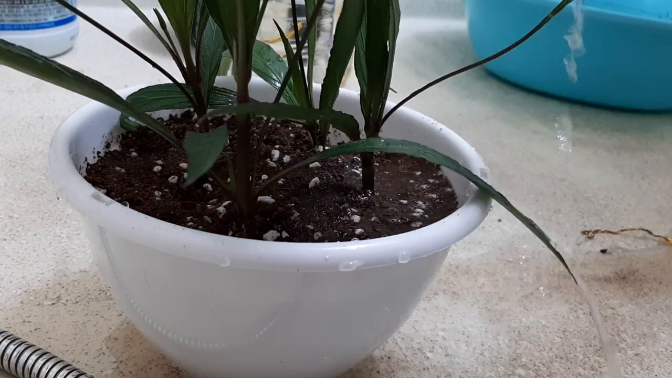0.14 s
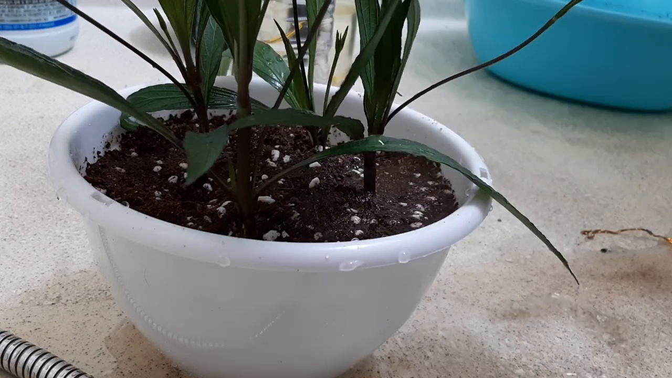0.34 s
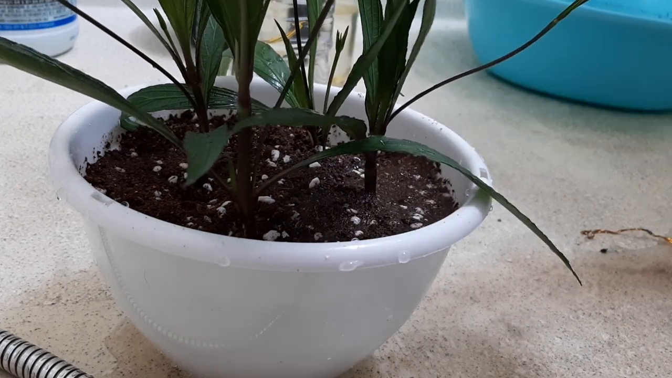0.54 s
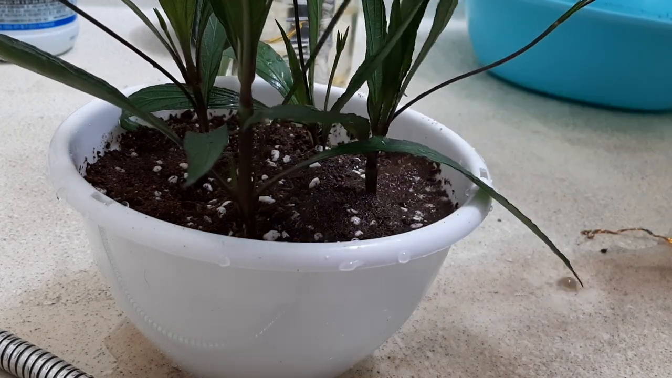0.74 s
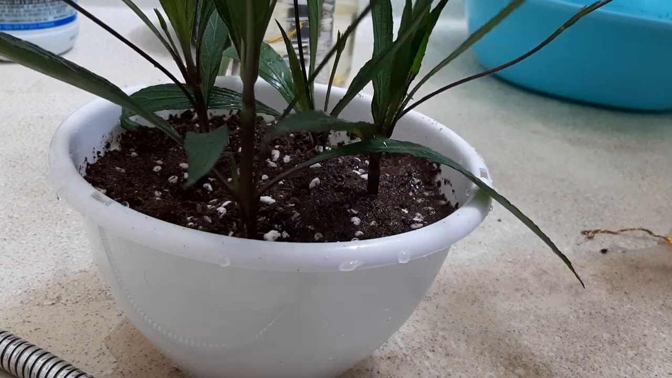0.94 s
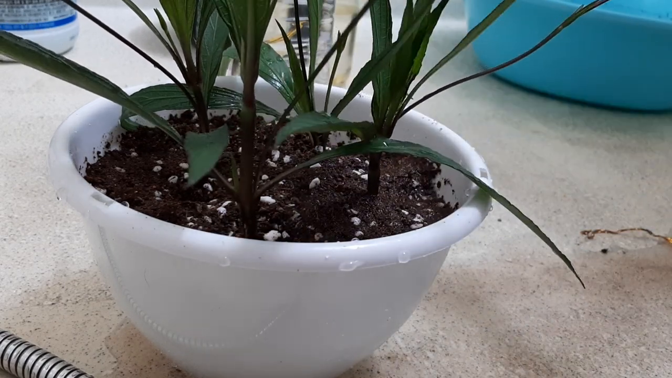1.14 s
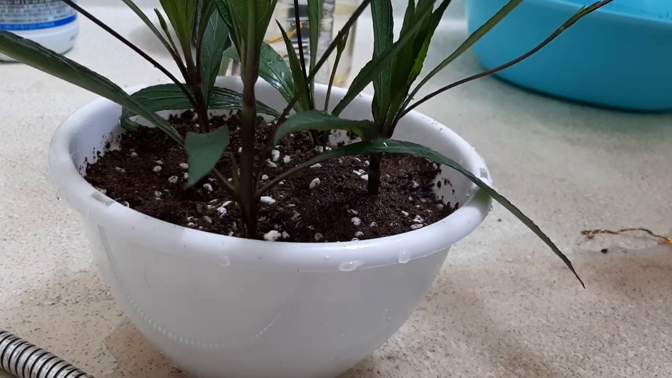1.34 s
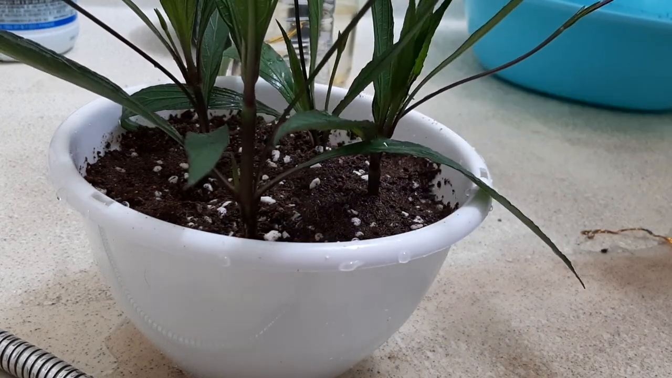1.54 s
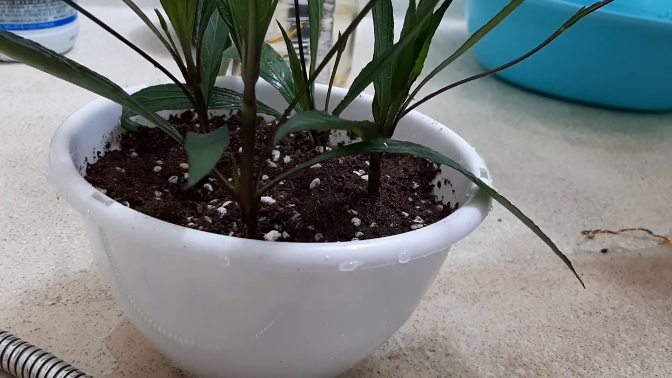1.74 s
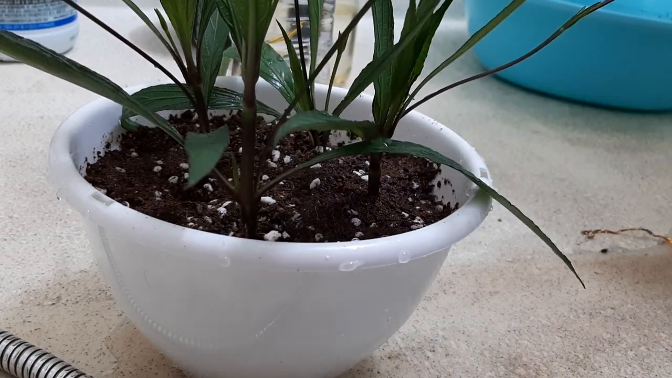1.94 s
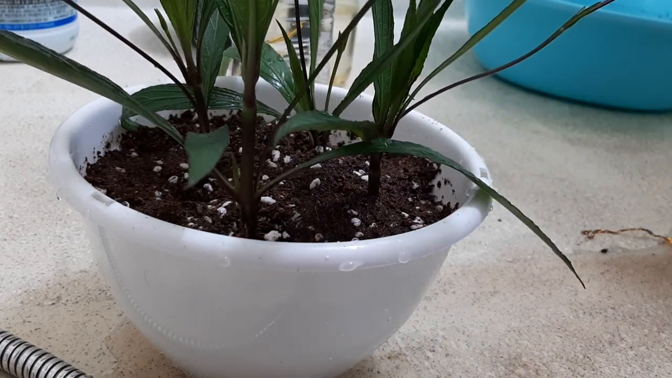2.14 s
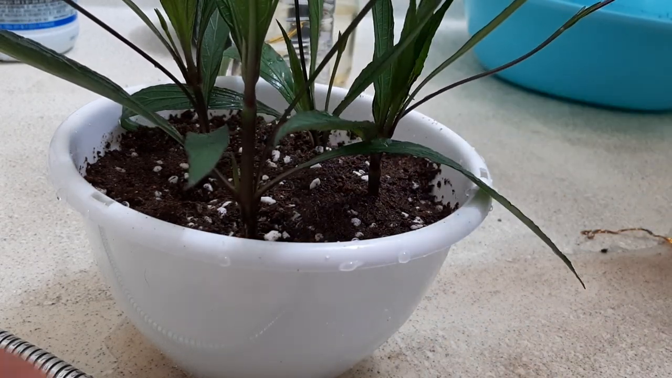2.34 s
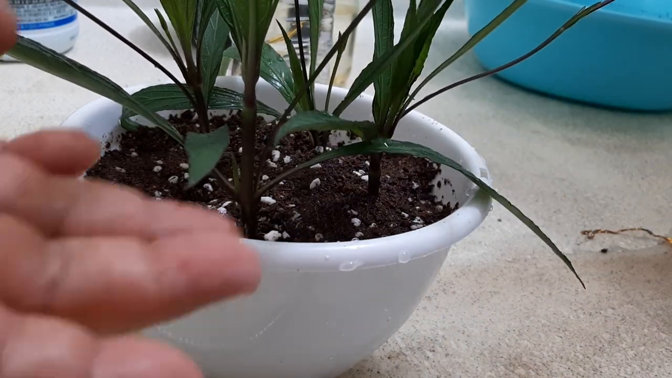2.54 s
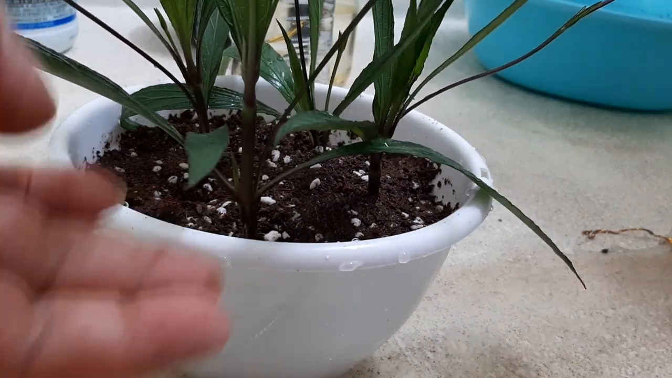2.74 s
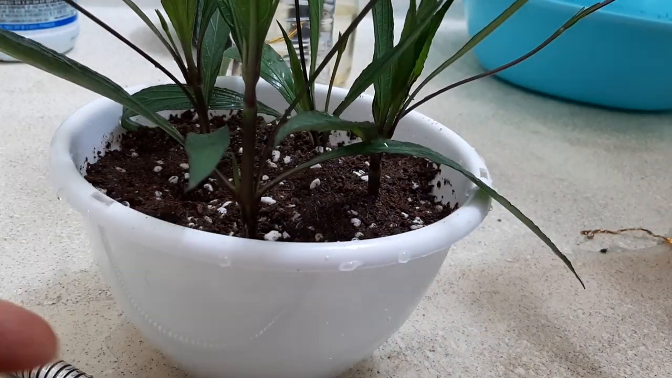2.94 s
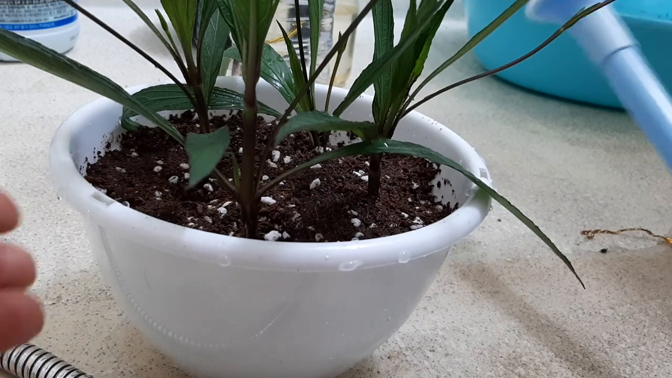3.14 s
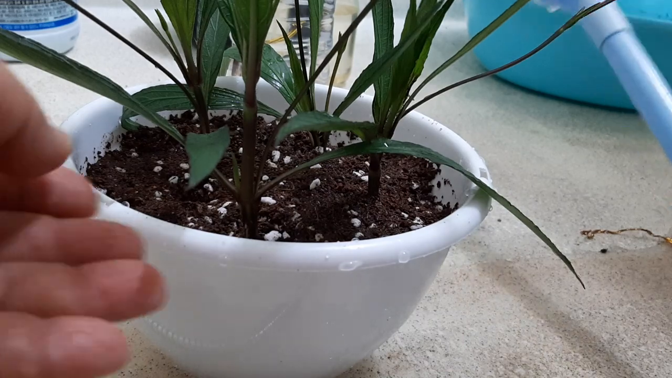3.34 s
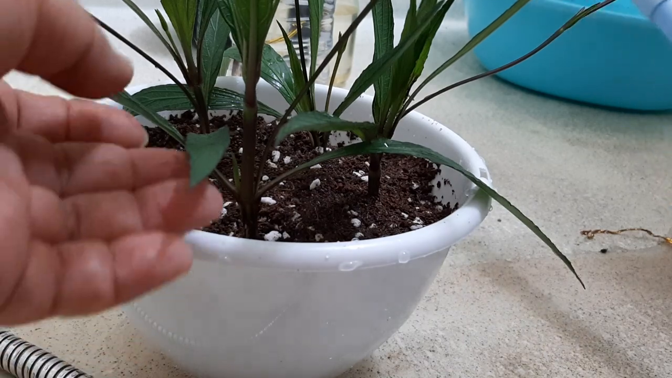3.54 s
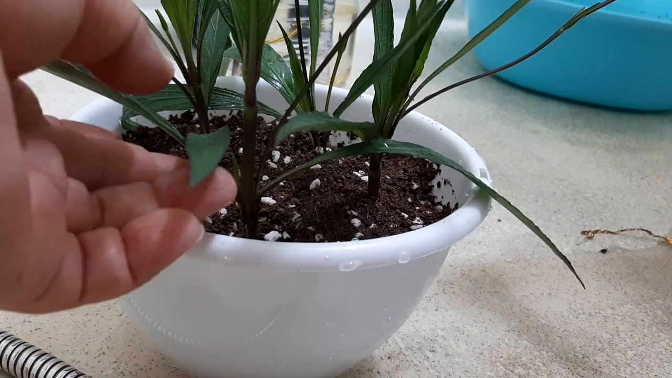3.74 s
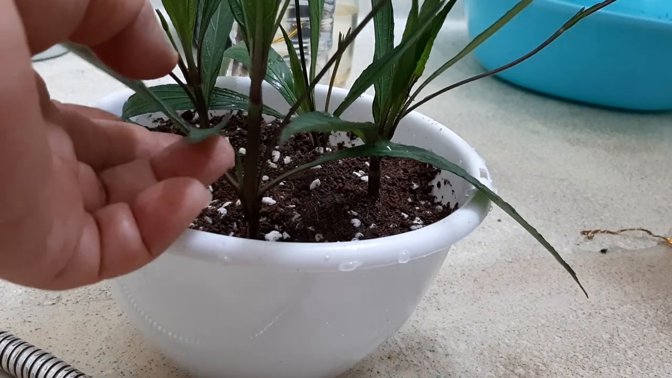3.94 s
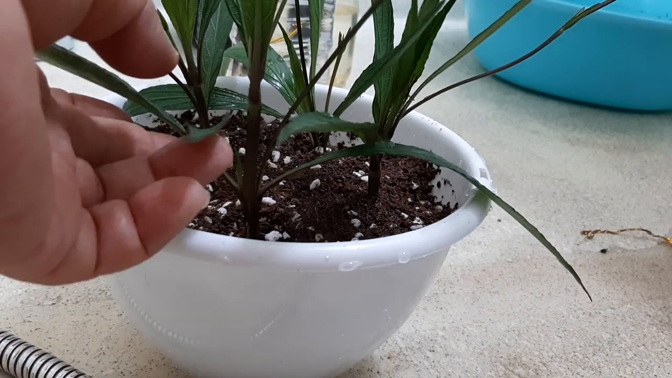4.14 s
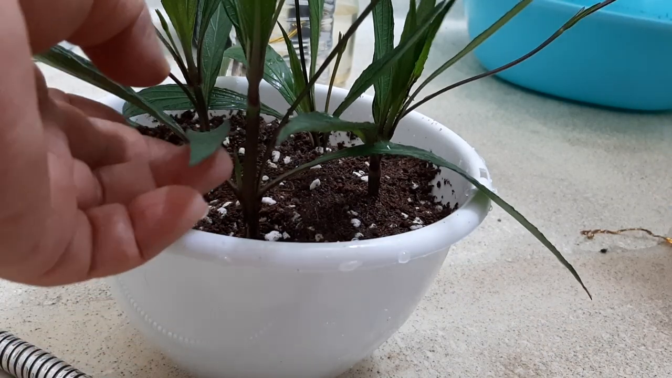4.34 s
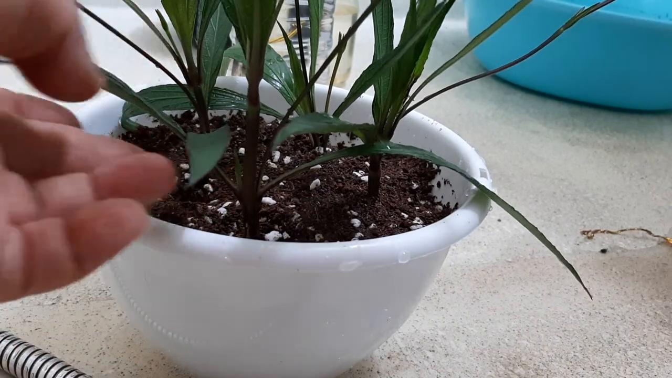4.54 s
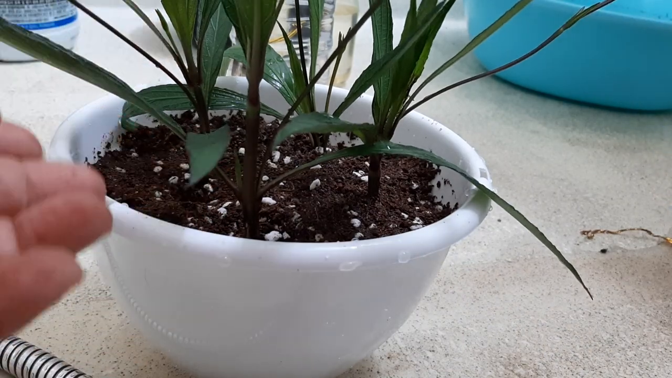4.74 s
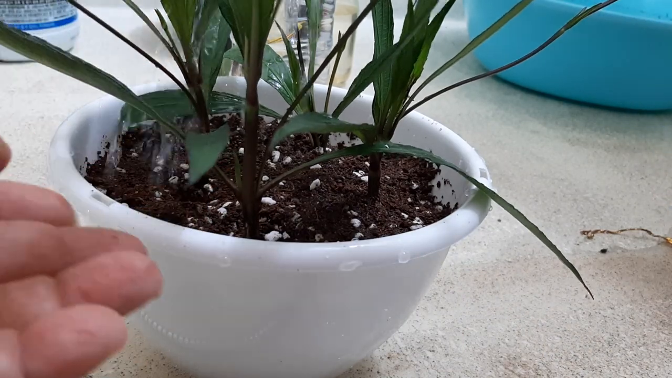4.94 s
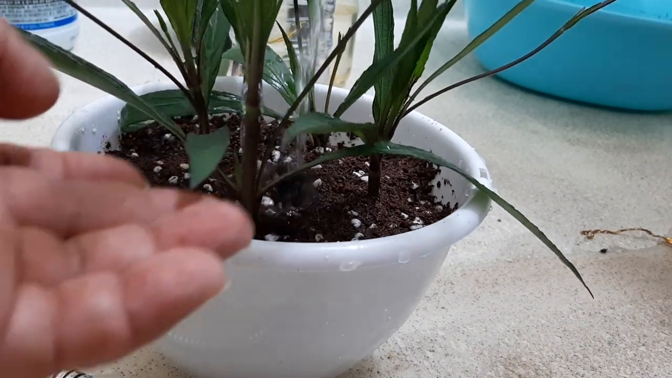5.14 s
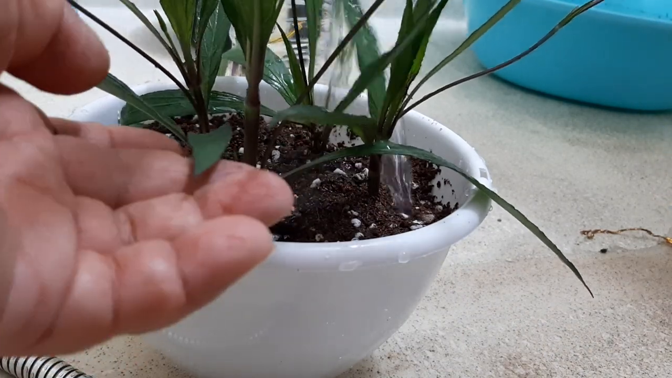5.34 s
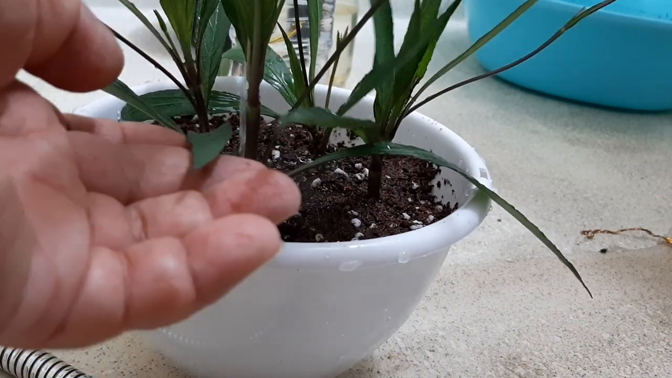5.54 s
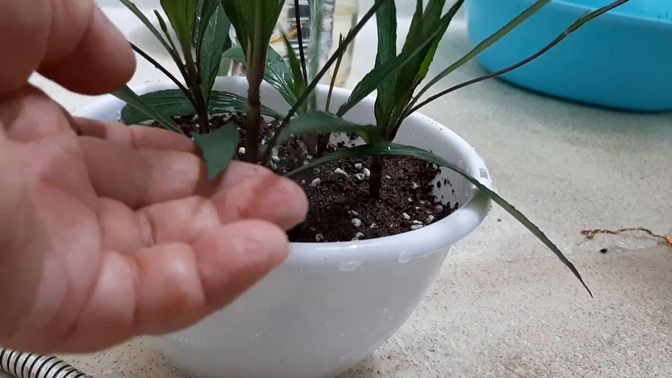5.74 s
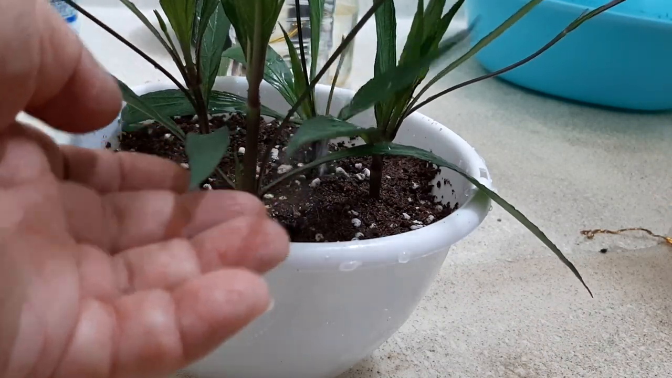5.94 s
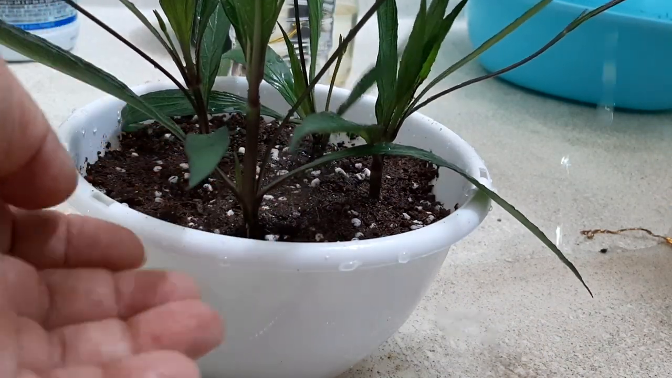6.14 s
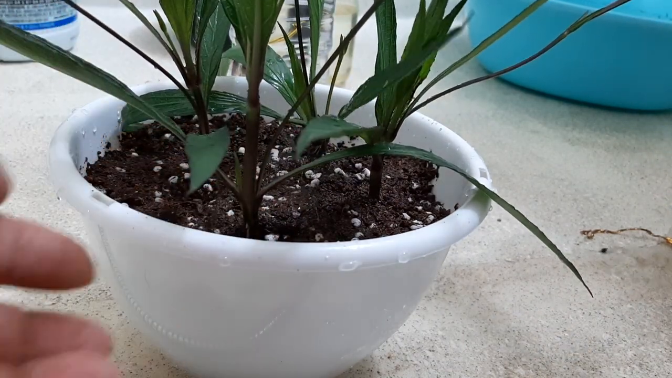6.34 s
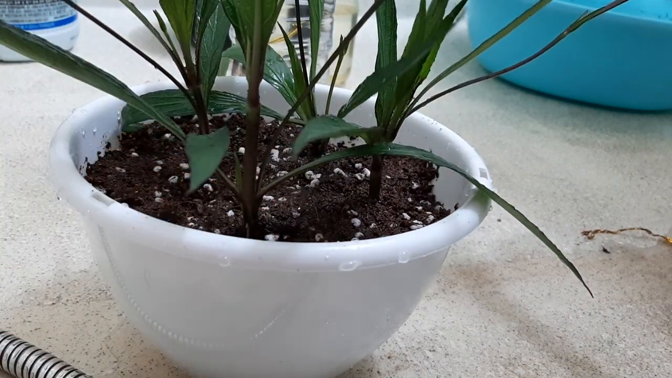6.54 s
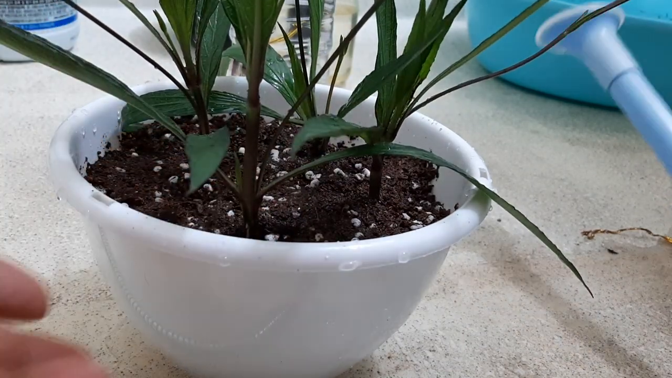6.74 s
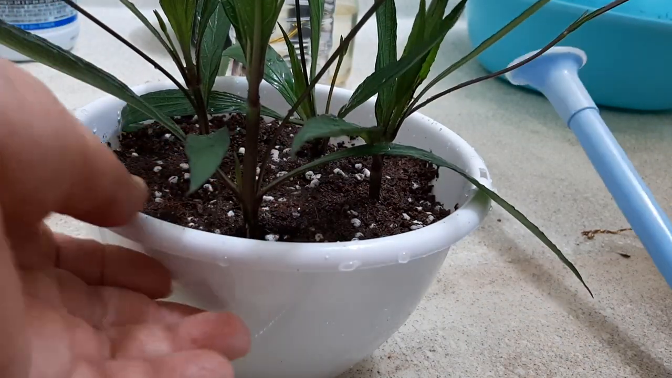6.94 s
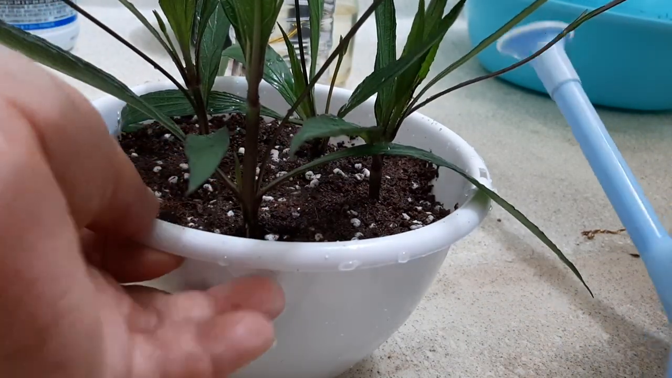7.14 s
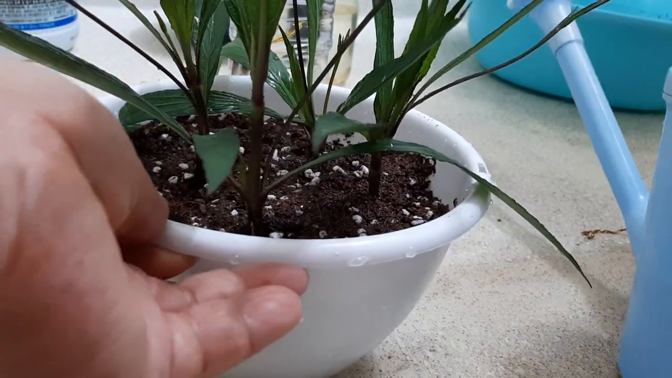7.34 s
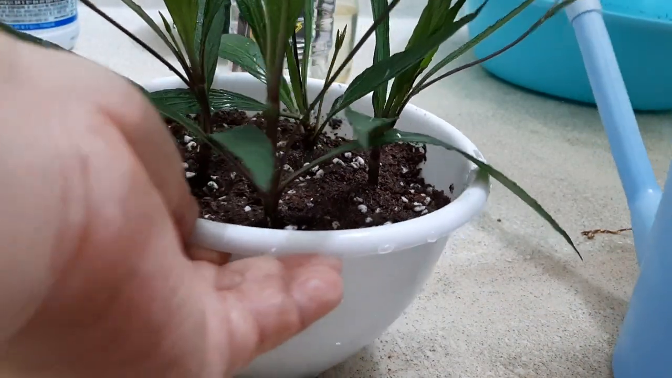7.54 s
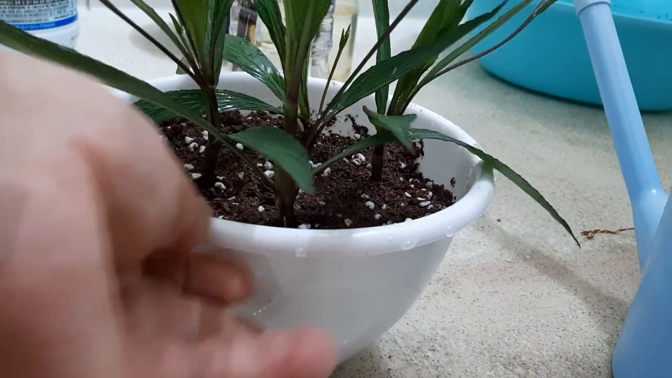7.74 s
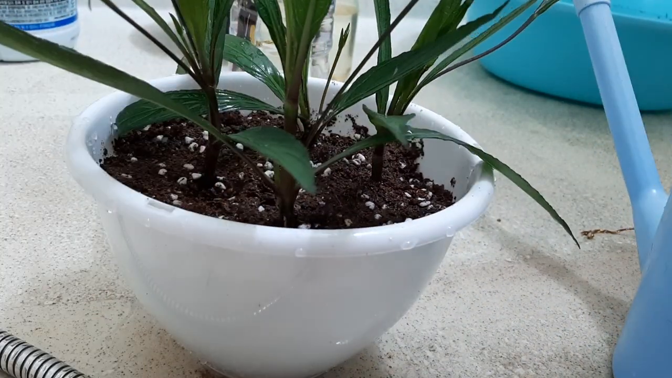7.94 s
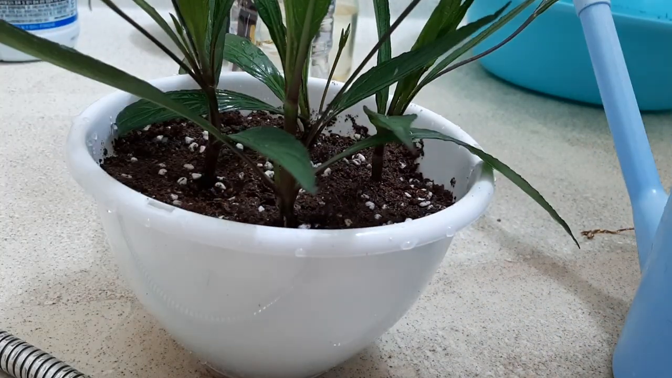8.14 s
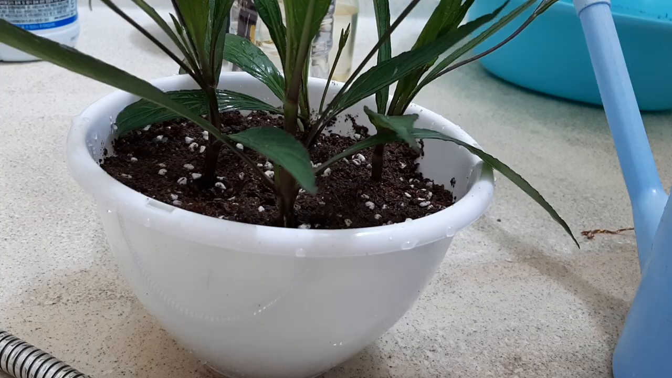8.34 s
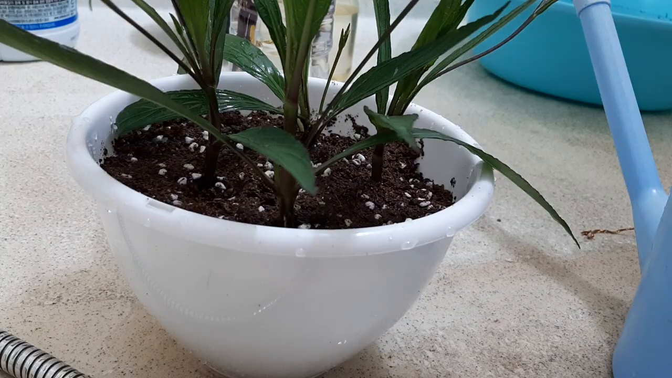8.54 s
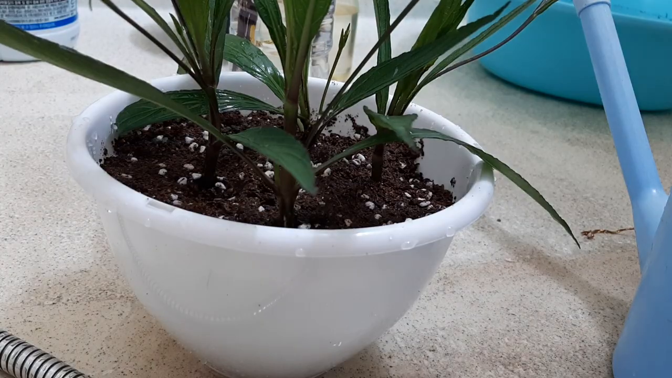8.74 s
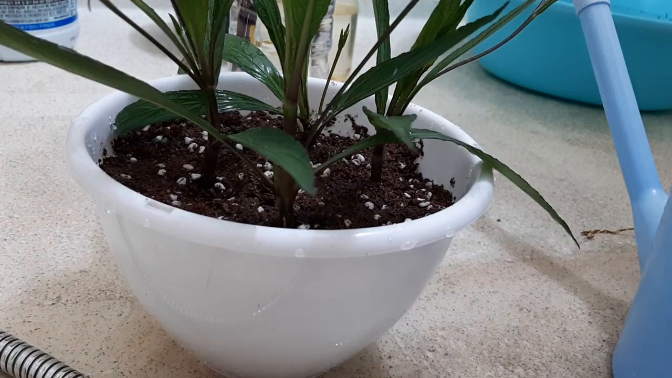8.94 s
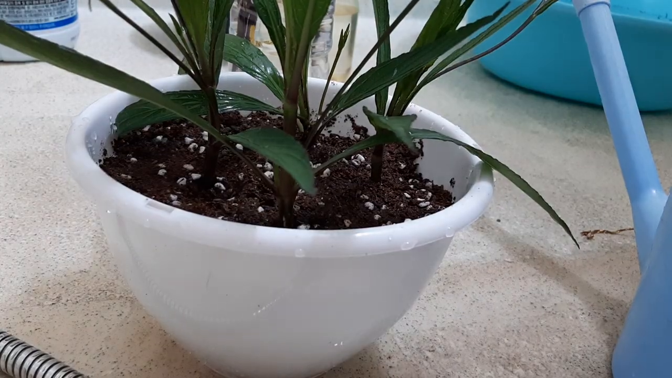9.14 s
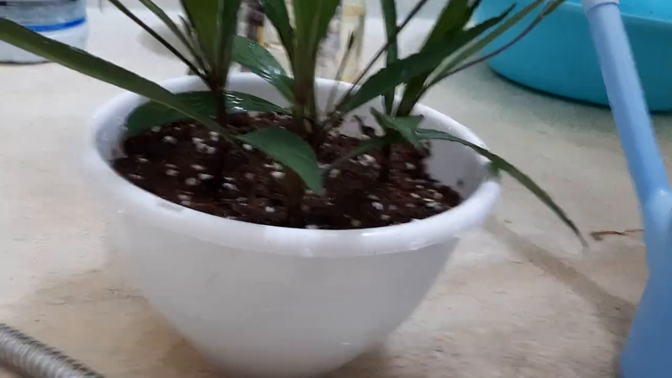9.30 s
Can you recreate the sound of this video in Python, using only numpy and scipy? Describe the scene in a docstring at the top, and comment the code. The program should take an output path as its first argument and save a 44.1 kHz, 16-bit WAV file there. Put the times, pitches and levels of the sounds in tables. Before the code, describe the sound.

A quiet small room with hard surfaces and short bright echoes, heard closely in stereo over soft low rumble, faint mains hum and thin hiss. From 0 to 0.7 s, a thin pour spatters on the floor slightly right, with crackling spray and separate sharp drops. Near-silence follows, with soft dull bumps and gritty sole scuffs around 1.5 and 2.7 s. A lone drip ticks at 4.0 s. From about 5.1 to 6.2 s, a second pour lands ahead in the pot: a very bright tick at 5.17, fizzing patter, leaf ticks and small wet splats. Between 7.0 and 7.6 s, a water-filled plastic can knocks and scrapes repeatedly onto the floor, hollow and low, with a short glug at 7.8. A stronger gritty scuff with dull thumps comes at 8.05-8.4 s, then a tiny quick plastic creak at 9.3.

```python
"""Water patters down in two short pours, first spilling to the floor on the right, then into a potted plant
ahead: sharp ticks of drops on leaves, soil and floor over droplets, spray and splats, in a small hard room.
A sole crackles over floor grit three times, hands bump softly, and the plastic can is set down: ringing
modes, scraping noise and one glug, a ringing bubble. The plastic creaks last, over rumble, mains hum and hiss."""
import sys
import numpy as np
from scipy import signal
from scipy.fft import rfft, irfft, next_fast_len
from scipy.io import wavfile

SR = 44100
rng = np.random.default_rng(int(sys.argv[2]) if len(sys.argv) > 2 else 0)


def dump(signal):
    """Clip the signal to [-1, 1] and save it as 16-bit WAV at the path in sys.argv[1]."""
    limited = np.clip(np.atleast_2d(signal).T, -1, 1)
    pcm = np.round(limited * 32767).astype(np.int16)
    wavfile.write(sys.argv[1], SR, pcm)


N = 413216
TIME = np.arange(N) / SR
SHORT = TIME[:SR // 2]  # half a second, long enough for one event
SPILL_ENDS_S = 1  # water lands on the floor before this time, in the pot after it
SPURT_DB, SPURTS_PER_S = 5.5, 45  # unevenness of the poured stream

# colour of grit and water on the hard floor: (frequency [Hz], relative level [dB])
FLOOR_COLOUR = [(300, -11.5), (1200, -3.5), (1550, 0), (3000, 1), (5000, 4.5), (8000, 2), (13500, 6.5),
                (16000, 5.5)]


def amp(db):
    """Decibels to gain."""
    return 10 ** (np.asarray(db) / 20)


def evened(x):
    """Scales to rms 1."""
    return x / np.sqrt(np.mean(x ** 2) + 1e-20)


def read(points, hz):
    """Reads a table on a log-frequency axis."""
    f, value = np.transpose(points)
    return np.interp(np.log(hz + 1), np.log(f + 1), value)


def add(mix, s, sound):
    """Mixes a sound in at time s."""
    part = mix[..., max(round(s * SR), 0):][..., :sound.shape[-1]]
    part += sound[..., :part.shape[-1]]


def colour(x, points, tilt_db=0, size=2048):
    """Causal (minimum-phase) filter of unit energy with the given spectrum, tilted per octave above 800 Hz."""
    hz = abs(np.fft.fftfreq(size, 1 / SR))
    tilt = tilt_db * np.log2(np.maximum(hz, 800))
    gain = evened(amp(read(points, hz) + tilt))
    spectrum = np.exp(np.conj(signal.hilbert(np.log(gain + 1e-5))))
    taps = np.fft.ifft(spectrum).real
    return signal.oaconvolve(x, taps)[:len(x)]


def snap(decay_s, size=2048):
    """A sharp click and a tiny burst after it, with the energy of one millisecond at rms 1."""
    burst = rng.standard_normal(size) * np.exp(-TIME[:size] / decay_s)
    burst = burst / np.linalg.norm(burst)
    burst[0] = 0.68  # the click
    return burst / np.linalg.norm(burst) * np.sqrt(SR / 1000)


def snaps(rows, decay_s):
    """One burst for each row (time [s], level [dB])."""
    out = np.zeros(N)
    for s, db in rows:
        add(out, s, amp(db) * snap(decay_s))
    return out


def grains(level, per_s, spread_db, fizz):
    """Random clicks of uneven size over a fine fizz, following an envelope."""
    sizes = amp(spread_db * np.minimum(rng.exponential(1, N), 3))
    signed = sizes * rng.choice([-1, 1], N)
    clicks = evened(signed * (rng.random(N) < per_s / SR))
    return level * evened(clicks + fizz * rng.standard_normal(N))


def spurts(depth_db, per_s):
    """Quick random swells: neither a stream nor a sole moves evenly."""
    knots = np.arange(0, TIME[-1] + 1, 1 / per_s)
    heights = np.clip(rng.standard_normal(len(knots)), -2, 2)
    return evened(amp(depth_db * np.interp(TIME, knots, heights)))


def diffuse(pair):
    """Two unrelated signals become a diffuse field: alike in the bass, apart in the treble."""
    # likeness of the two microphones: (frequency [Hz], correlation [-1 to 1])
    likeness = [(50, 0.91), (250, 0.86), (500, 0.32), (1000, 0.035), (16000, 0.033)]
    size = next_fast_len(pair.shape[1], True)
    a, b = rfft(pair, size)
    same = np.clip(read(likeness, np.fft.rfftfreq(size, 1 / SR)), -1, 1)
    mid = np.sqrt((1 + same) / 2) * a
    side = np.sqrt((1 - same) / 2) * b
    return irfft(np.array([mid + side, mid - side]), size)[:, :pair.shape[1]]


def panned(x, left_db):
    """Shares a sound between the two microphones, the left one louder than the right by left_db."""
    return x * amp([[left_db / 2], [-left_db / 2]])


def room_tail():
    """One echo pattern of the bare room, its decay time read by frequency; the treble dies first."""
    # decay of the room: (frequency [Hz], time to fall by 60 dB [s])
    room_t60 = [(100, 0.55), (350, 0.31), (1000, 0.3), (4000, 0.25), (9000, 0.24), (15000, 0.15)]
    noise = diffuse(rng.standard_normal((2, len(SHORT))))
    hz, t, bands = signal.stft(noise, SR, nperseg=256)
    decay = amp(-60 * t / read(room_t60, hz)[:, None])
    tail = signal.istft(bands * decay, SR, nperseg=256)[1][:, :len(SHORT)]
    tail = tail * np.clip(SHORT / 0.00011 - .5, 0, 1)  # keeps the very first samples clear
    return tail / np.linalg.norm(tail[0])


def in_room(pair, wet_db, lag_s=0):
    """Direct sound, lag_s later at the left microphone, plus echoes turning through two patterns at 10 Hz."""
    turn = 2 * np.pi * 10 * TIME
    wet = np.zeros((2, N))
    for share in (np.cos(turn), np.sin(turn)):
        wet += signal.oaconvolve(pair * share, room_tail(), axes=1)[:, :N]
    direct = np.array([np.roll(pair[0], round(lag_s * SR)), pair[1]])
    return (direct + amp(wet_db) * wet) / np.hypot(1, amp(wet_db))


def water():
    """The first water spills past the rim to the floor on the right; the rest lands in the pot ahead."""
    falling = drops() + pours()
    spilled = panned(falling * (TIME < SPILL_ENDS_S), left_db=-3)
    potted = panned(falling * (TIME >= SPILL_ENDS_S), left_db=-.5)
    on_floor = in_room(spilled, wet_db=-2, lag_s=.00047)
    in_pot = in_room(potted, wet_db=-3, lag_s=-.0001)
    return on_floor + in_pot


def drops():
    """Each larger drop is one sharp tick with its own tilt; faint drips off wet leaves fall at random."""
    # drops on leaves, rim and floor: (time [s], relative level [dB], tilt [dB per octave])
    drop_rows = [(0.051, -55.5, -6), (.122, -50, 4), (0.15, -47, 13), (.168, -43.5, -1.5),
                 (0.236, -51.5, 0.5), (0.2834, -42, 15), (.36, -50, 0), (.456, -47, -3.5),
                 (0.477, -47.5, -2), (0.5887, -49, -2.5), (.609, -58.5, -3), (0.7283, -54.5, 0.5),
                 (2.338, -58, -2), (2.387, -52, 3.5), (3.23, -63, -7), (4.0188, -48, 6),
                 (5.0847, -34.5, -0.5), (5.152, -47, 0.5), (5.169, -18.5, 16.5), (5.429, -48, 7),
                 (5.5617, -41, 8), (5.6147, -43, 2), (5.728, -53.5, 1), (5.824, -48.5, -3.5),
                 (5.853, -45.5, -4.5), (5.9288, -32.5, 0.5), (5.96, -41, -1), (5.99, -38.5, 1),
                 (6.033, -39.5, 2), (6.377, -61.5, -6), (6.9087, -53, -5.5), (7.746, -44, -4),
                 (7.773, -41, -5.5), (8.619, -52, -2.5), (8.696, -50, 1), (8.925, -49, 2.5)]
    # colour of a drop's tick: (frequency [Hz], relative level [dB])
    drop_colour = [(300, -25), (1600, -12), (3000, -6), (7500, 4), (11000, -3), (15000, 8)]
    drips_per_s, loudest_drip_db, drip_range_db = 2, -64, 6  # relative, like the drops
    out = np.zeros(N)
    for s, db, tilt_db in drop_rows:
        add(out, s, amp(db) * colour(snap(decay_s=0.0021), drop_colour, tilt_db))
    chances = rng.random((round(drips_per_s * TIME[-1]), 2))
    drips = [(when * TIME[-1], loudest_drip_db - drip_range_db * small) for when, small in chances]
    return amp(14.5) * (out + colour(snaps(drips, decay_s=0.00049), drop_colour))


def pours():
    """Separate droplets patter over a spurting spray that crackles on the floor and fizzes in the soil."""
    # colour of water landing in the pot: (frequency [Hz], relative level [dB])
    pour_colour = [(300, -17), (1500, 1), (2900, -5), (5000, 9), (7700, 7.5), (9600, 0), (12300, 5),
                   (14500, 8), (16000, -0.5)]
    spray_per_s = 900
    level, potted = flow(), TIME >= SPILL_ENDS_S
    patter = level * droplets() * spurts(SPURT_DB, SPURTS_PER_S)
    crackle = grains(level, spray_per_s, spread_db=4, fizz=.4)
    fizz = grains(level, spray_per_s, spread_db=3, fizz=.9) * spurts(SPURT_DB, SPURTS_PER_S)
    on_floor = amp(-4) * colour((patter + crackle) * ~potted, FLOOR_COLOUR)
    in_pot = amp(-3) * colour((patter + fizz) * potted, pour_colour)
    return on_floor + in_pot + splats()


def flow():
    """How much water is landing: gushes swell to a crest and die away, their powers adding up."""
    # gushes: (time of the crest [s], relative level [dB], length [s])
    gush_rows = [(.005, -43, 0.091), (0.141, -47.5, 0.054), (0.405, -47.5, 0.14), (0.613, -42, 0.024),
                 (5.138, -53.5, 0.46), (5.58, -51.5, 0.43), (5.968, -45, 0.22), (6.11, -53.5, 0.3)]
    # a gush swells for this share of its length; both ends lie this far from the crest
    rise_share, ends_db = 0.48, -12
    power = np.zeros(N)
    for s, db, length_s in gush_rows:
        away = np.maximum((s - TIME) / rise_share, (TIME - s) / (1 - rise_share)) / length_s
        power += amp(2 * (db + ends_db * away))
    return np.sqrt(power)


def droplets(size=512):
    """Tiny plips, each with its own pitch and strength; the higher the pitch, the faster the decay."""
    per_s, low_hz, high_hz, decay_cycles, spread_db = 520, 2500, 15000, 2.5, 14
    out, t = np.zeros(N), TIME[:size]
    for when, small, hard in rng.random((round(per_s * TIME[-1]), 3)):
        hz = low_hz + (high_hz - low_hz) * small
        plip = np.sin(2 * np.pi * hz * t) * np.exp(-t * hz / decay_cycles)
        add(out, when * TIME[-1], amp(spread_db * hard ** 2) * evened(plip))
    return evened(out)


def splats(decay_s=0.01, band=1.345):
    """A blob slaps a hollow in the wet soil: a short burst around that hollow's pitch."""
    # fat blobs of water on the wet soil: (time [s], relative level [dB], pitch [Hz])
    splat_rows = [(5.64, -33.5, 1320), (5.665, -37.5, 1280), (5.858, -38, 1430), (5.902, -42, 1280),
                  (6.086, -52, 2400), (6.112, -46, 2720), (6.188, -49, 1290)]
    out = np.zeros(N)
    for s, db, hz in splat_rows:
        hollow = signal.butter(2, [hz / band, hz * band], "bandpass", fs=SR)
        add(out, s, amp(db + 12) * signal.lfilter(*hollow, snap(decay_s)))
    return out


def can(touch_s=0.00096, bite_s=0.00093):
    """Each contact rings the can's body while its base grinds briefly on the floor; heavy landings are duller."""
    # meetings with the floor:
    # (time [s], relative thump level [dB], relative scrape level [dB], scrape decay [s])
    knock_rows = [(7.02, -41, -63, 0.055), (7.092, -40.5, -49.5, 0.0062), (7.166, -39.5, -52.5, 0.024),
                  (7.197, -36.5, -25, 0.0095), (7.282, -29.5, -25, 0.03), (7.308, -25.5, -39, 0.012),
                  (7.358, -34, -30, 0.011), (7.41, -44.5, -36.5, 0.012), (7.512, -46.5, -48, 0.055),
                  (7.611, -46, -31, 0.0055), (7.625, -24, -23.5, 0.0038)]
    # modes of the water-filled plastic can: (frequency [Hz], relative level [dB], 60 dB decay time [s])
    can_modes = [(85, -6.5, 0.15), (122.5, -4, 0.086), (181, -3.5, 0.072), (234, -7, 0.28),
                 (311.6, 2, 0.097), (348, -3, 0.18), (513, -3, 0.08), (573, 1, 0.075), (803, -3.5, 0.05),
                 (918, -6, 0.09)]
    # colour of the base on the floor: (frequency [Hz], relative level [dB])
    scrape_colour = [(80, -33.5), (520, 6.5), (720, -5.5), (900, 10), (1020, 0), (1270, 6), (1440, -3),
                     (1800, 3), (2700, -1), (7700, -14.5), (9000, -15.5), (15000, -19.5)]
    # thumps above heavy_db lose treble: dB per octave for each dB above it
    heavy_db, muffling, scrape_tilt_db = -28, 0.73, 3
    out = np.zeros(N)
    mode_hz, mode_db, t60 = np.transpose(can_modes)[:, :, None]
    modes = amp(mode_db - 60 * SHORT / t60) * np.sin(2 * np.pi * mode_hz * SHORT)
    octaves_up = np.log2(np.maximum(mode_hz / np.median(mode_hz), 1))
    for s, thump_db, scrape_db, decay_s in knock_rows:
        muffle_db = muffling * max(thump_db - heavy_db, 0)
        damped = modes * amp(-muffle_db * octaves_up)
        # each spot of the base drives the modes with other signs, drawn at random
        body = rng.choice([-1, 1], len(can_modes)) @ damped * (1 - np.exp(-SHORT / touch_s))
        grind_level = np.exp(-SHORT / decay_s) * (1 - np.exp(-SHORT / bite_s))
        grind = rng.standard_normal(len(SHORT)) * grind_level
        scrape = colour(grind, scrape_colour, scrape_tilt_db - muffle_db)
        add(out, s, amp(thump_db - 6) * body + amp(scrape_db + 4) * scrape)
    return in_room(panned(out, left_db=-1.5), wet_db=0, lag_s=0.00017)


def bubbles():
    """A bubble swells over a few cycles and rings, its pitch rising near the surface; froth rings fuzzily."""
    # air bubbles in the water:
    # (time [s], relative level [dB], starting pitch [Hz], 60 dB decay time [s], fuzziness [Hz])
    bubble_rows = [(.728, -63, 2060, 0.029, 23), (5.39, -67.5, 2330, 0.35, 230),
                   (6.284, -64, 4880, 0.1, 96), (7.774, -18.5, 496, 0.03, 9.1), (7.861, -57, 766, 0.11, 90)]
    rise_hz_per_s, swell_cycles = 3200, 4
    out = np.zeros(N)
    for s, db, hz, t60, fuzz_hz in bubble_rows:
        wander = np.cumsum(rng.standard_normal(len(SHORT))) * np.sqrt(2 * np.pi * fuzz_hz / SR)
        turns = np.cumsum(hz + rise_hz_per_s * SHORT) / SR
        swell = np.minimum(turns / swell_cycles, 1) ** 2
        ring = np.sin(2 * np.pi * turns + wander)
        add(out, s, amp(db - 60 * SHORT / t60) * swell * ring)
    return amp(5) * in_room(np.array([out, out]), wet_db=-4.5)


def scuffs():
    """Sand is crushed under a sliding sole: dense crackle with a few larger cracks."""
    # single grains cracking under the sole: (time [s], relative level [dB])
    grit_rows = [(1.611, -44.5), (1.729, -40.5), (1.765, -41), (1.798, -38), (2.757, -36.5), (2.828, -40),
                 (8.082, -33.5), (8.152, -29.5), (8.175, -27), (8.327, -38)]
    crackle = grains(pressure(), per_s=2200, spread_db=4.3, fizz=.3) * spurts(depth_db=3, per_s=130)
    cracks = snaps(grit_rows, decay_s=0.0024)
    sand = colour(amp(1) * crackle + amp(12) * cracks, FLOOR_COLOUR)
    return in_room(panned(sand, left_db=-3.5), wet_db=-1.5, lag_s=.00047)


def pressure(lift_s=0.0049):
    """The sole takes the weight, slides evenly and lifts off in an exponential fall."""
    # slides over grit: (start [s], length [s], relative level [dB], time to take the weight [s])
    scuff_rows = [(1.502, 0.25, -45.5, 0.12), (2.668, 0.15, -39.5, 0.11), (8.047, 0.28, -35.5, 0.024)]
    total = np.zeros(N)
    for s, length_s, db, attack_s in scuff_rows:
        weight = np.clip((TIME - s) / attack_s, 0, 1)
        lift = np.exp(-np.maximum(TIME - s - length_s, 0) / lift_s)
        total += amp(db) * weight * lift
    return total


def bumps(rise_s=0.0033):
    """Soft, dull pushes of handling: low noise that swells and fades."""
    # bumps: (time [s], relative level [dB], decay [s])
    bump_rows = [(1.191, -59, 0.046), (2.19, -66, 0.13), (2.76, -56.5, 0.095), (3.337, -61, 0.12),
                 (3.866, -64.5, 0.12), (4.028, -61, 0.052), (4.638, -54, 0.065), (5.09, -51, 0.067),
                 (5.3, -55.5, 0.15), (5.469, -48, 0.094), (6.275, -45.5, 0.061), (6.599, -56, 0.073),
                 (8.064, -47, 0.19), (8.16, -31, 0.049), (8.358, -33, 0.02), (8.59, -56, 0.096)]
    # colour of a bump: (frequency [Hz], relative level [dB])
    bump_colour = [(40, -20.5), (120, -11), (180, 4), (236, 4), (272, -8.5), (312, 2), (385, 1.5),
                   (430, -9.5), (650, -30.5), (3000, -43.5)]
    out = np.zeros(N)
    for s, db, decay_s in bump_rows:
        push = (1 - np.exp(-SHORT / rise_s)) * np.exp(-SHORT / decay_s)
        boom = colour(push * rng.standard_normal(len(SHORT)), bump_colour)
        add(out, s, amp(db) * evened(boom) * np.sqrt(np.mean(push ** 2)))
    return amp(0.5) * in_room(panned(out, left_db=-1.5), wet_db=-7)


def creak():
    """A quickening run of slips in the plastic as it settles, each a tiny snap."""
    # slips: (time [s], relative level [dB])
    slip_rows = [(9.286, -51), (9.31, -45), (9.32, -47), (9.327, -52)]
    # colour of the creaking plastic: (frequency [Hz], relative level [dB])
    creak_colour = [(500, 6.5), (2000, -5), (3400, 6), (4300, -2), (6300, 5.5), (8500, -39)]
    slips = colour(snaps(slip_rows, decay_s=0.0005), creak_colour)
    return amp(1) * in_room(panned(slips, left_db=1), wet_db=1.5)


def air(hum_hz=59, hum_db=-69):
    """A low, gently wavering rumble, a faint, steady mains hum and a faint, drifting hiss."""
    # drift of the rumble and of the hiss: (time [s], level before wavering [dB])
    rumble_level, hiss_level = [(0, -58), (.8, -66.5), (1.8, -63.5), (3.8, -66), (5.3, -62.5), (6.7, -64.5),
                                (9.37, -63)], [(0, -87), (1.1, -81), (2.1, -72.5), (3.6, -71), (4.4, -75),
                                                (6.7, -77.5), (8.5, -72.5), (9.0, -70.5)]
    # colours of rumble and hiss: (frequency [Hz], relative level [dB])
    rumble_colour, hiss_colour = [(20, -8.5), (50, 1), (90, -1), (270, -11), (380, -8.5), (620, -27),
                                  (900, -20.5), (1500, -27), (3000, -45.5)], [(300, -48.5), (1400, -1), (1900, -2), (3500, -3.5),
                                                         (7300, -1.5), (8700, -13.5), (11000, -1),
                                                         (15000, -5)]
    waver_db = np.interp(TIME, np.linspace(0, TIME[-1], 90), rng.standard_normal(90))
    rumble = diffuse(np.array([colour(noise, rumble_colour) for noise in rng.standard_normal((2, N))]))
    hiss = diffuse(np.array([colour(noise, hiss_colour) for noise in rng.standard_normal((2, N))]))
    rumble_db = np.interp(TIME, *np.transpose(rumble_level)) + waver_db
    hiss_db = np.interp(TIME, *np.transpose(hiss_level)) + waver_db / 2
    hum = amp(hum_db) * np.sqrt(2) * np.sin(2 * np.pi * hum_hz * TIME)
    return panned(hum + rumble * amp(rumble_db) + hiss * amp(hiss_db), left_db=-1.5)


def scene():
    """All sources in the room."""
    return water() + can() + bubbles() + scuffs() + bumps() + creak() + air()


def record(dry, notch_hz=8900, width_hz=800, notch_db=-7, left_dull_db=-4, edge_hz=15950):
    """The microphone ports cut a notch in the treble, and the left one is duller; then the band limit."""
    size = next_fast_len(N, True)
    hz = np.fft.rfftfreq(size, 1 / SR)
    notch = amp(notch_db * np.exp(-((hz - notch_hz) / width_hz) ** 2))
    left_dulling = amp(left_dull_db * hz / edge_hz)  # grows with frequency
    ports = np.array([notch * left_dulling, notch])
    heard = irfft(rfft(dry, size) * ports, size)[:, :N]
    band_limit = signal.firwin(255, edge_hz, window=("kaiser", 8), fs=SR)
    return signal.oaconvolve(heard, band_limit[None], "same")


dry = scene()
out = record(dry)
dump(out)
```